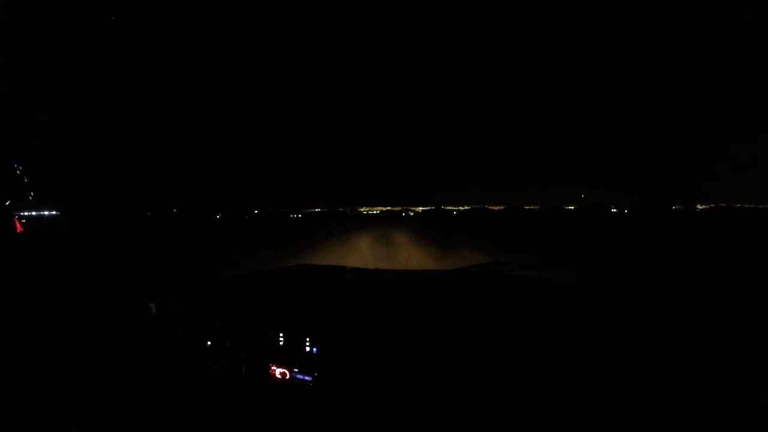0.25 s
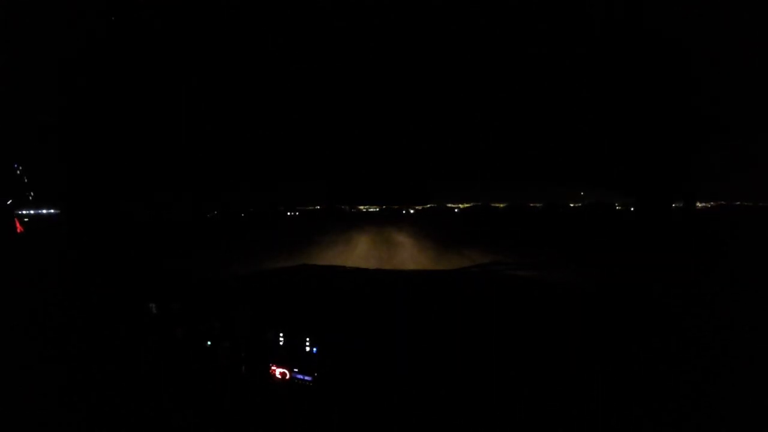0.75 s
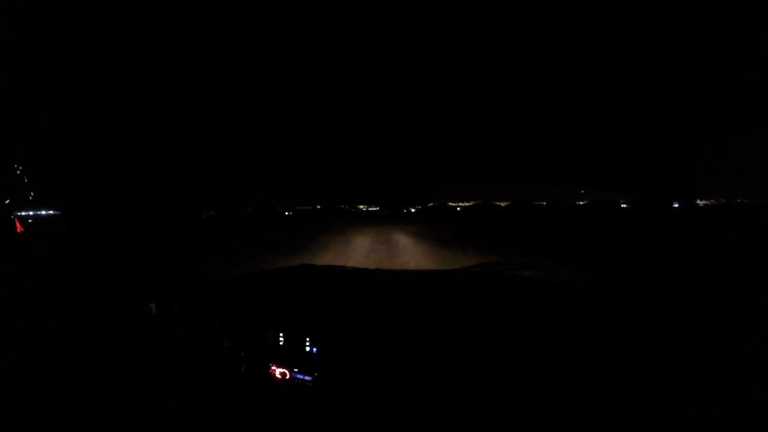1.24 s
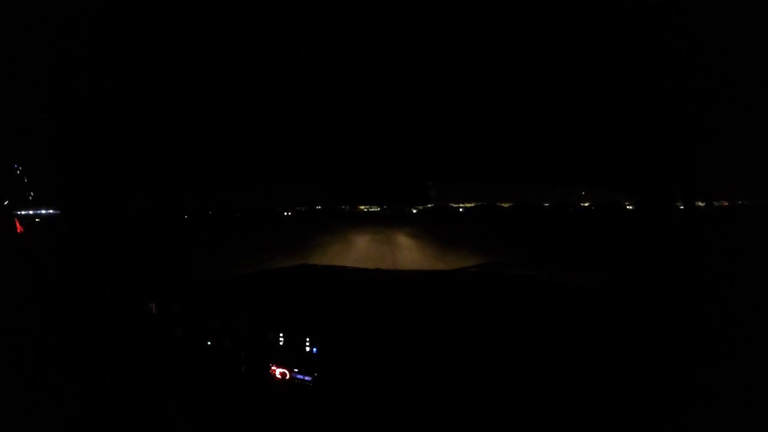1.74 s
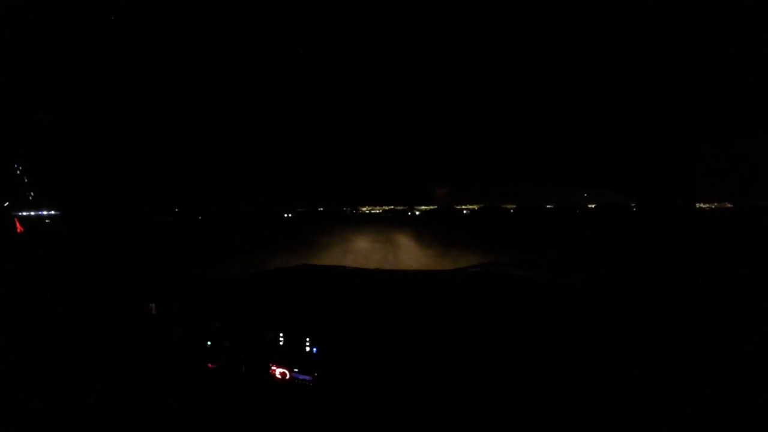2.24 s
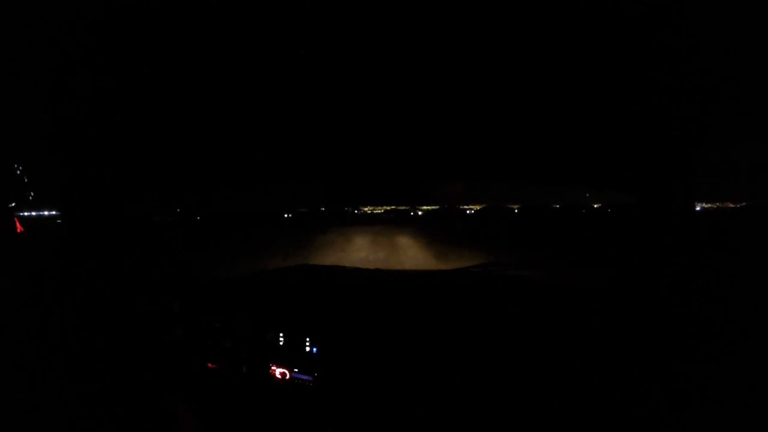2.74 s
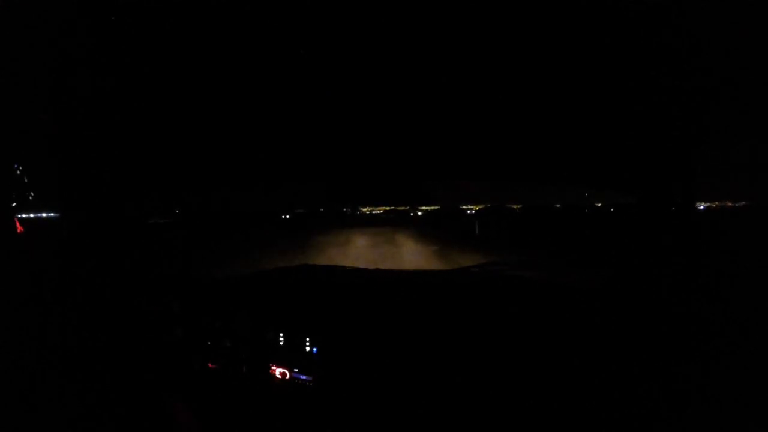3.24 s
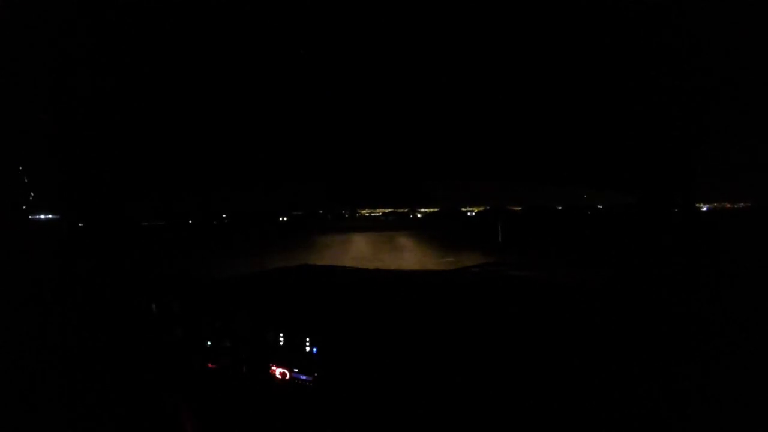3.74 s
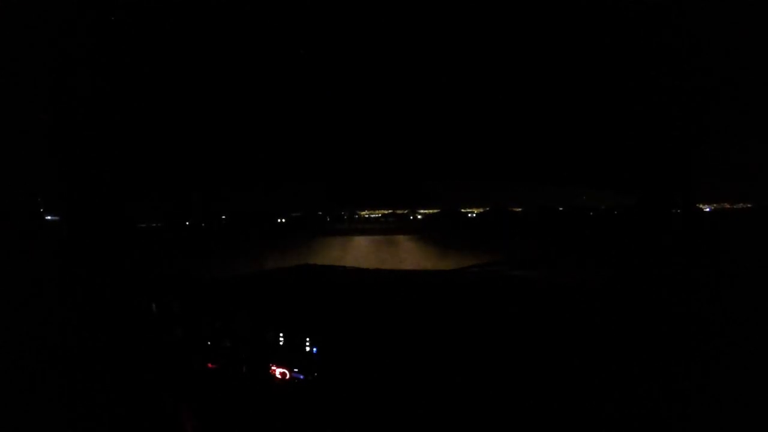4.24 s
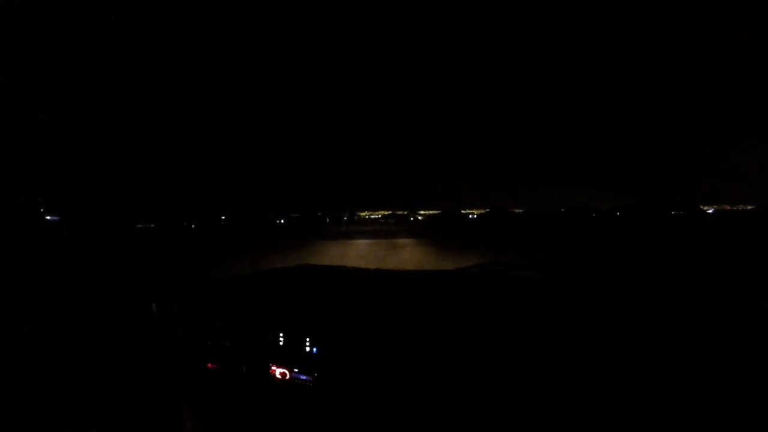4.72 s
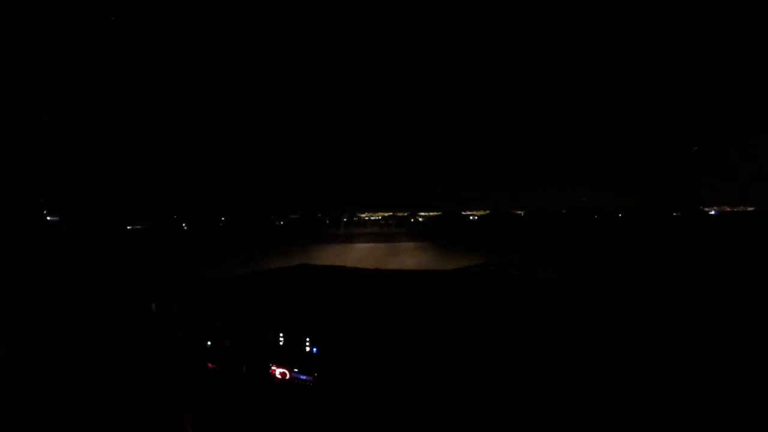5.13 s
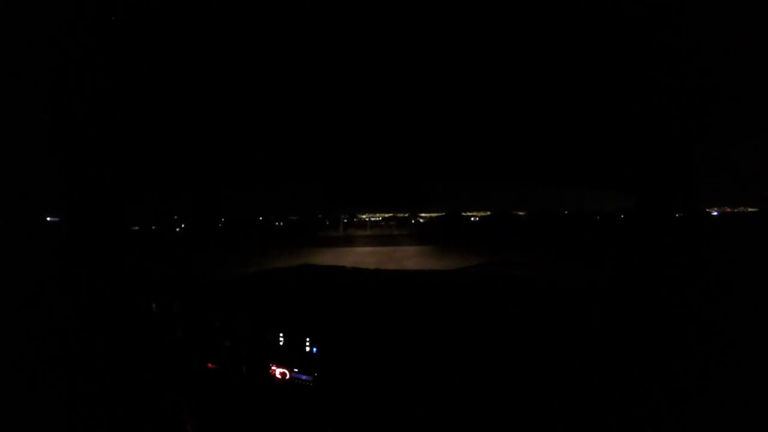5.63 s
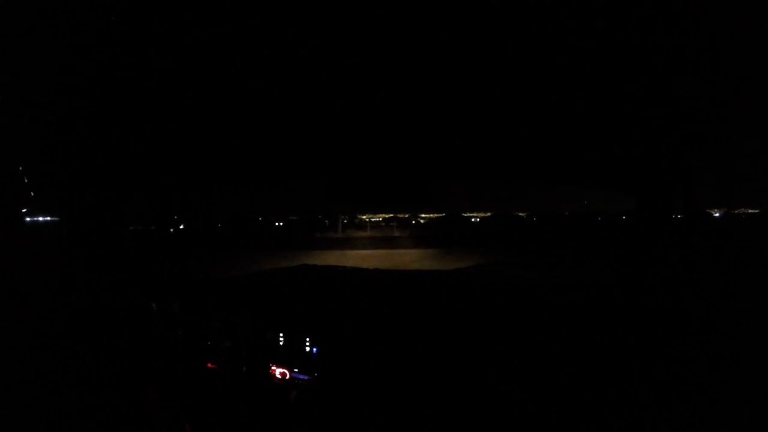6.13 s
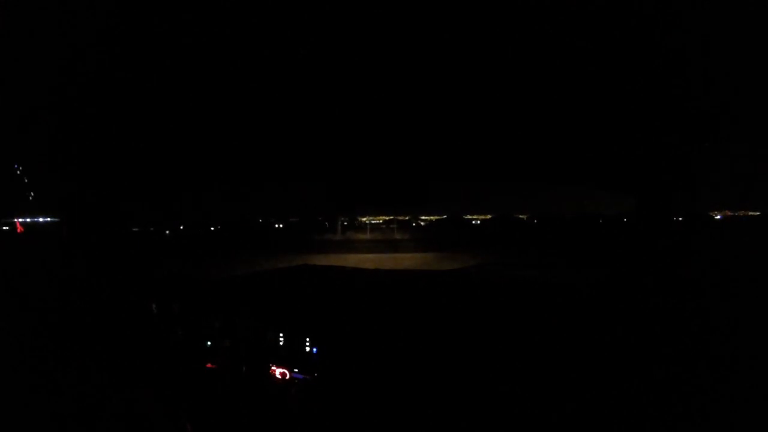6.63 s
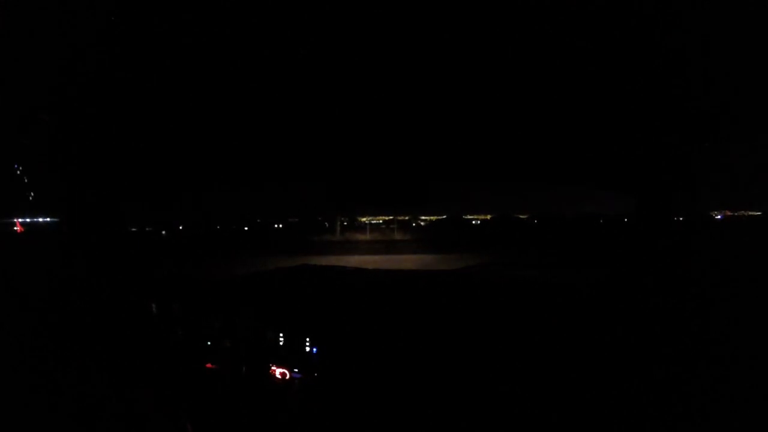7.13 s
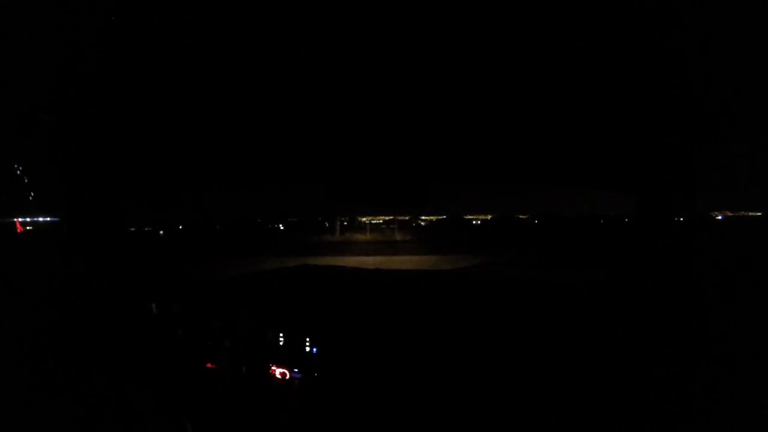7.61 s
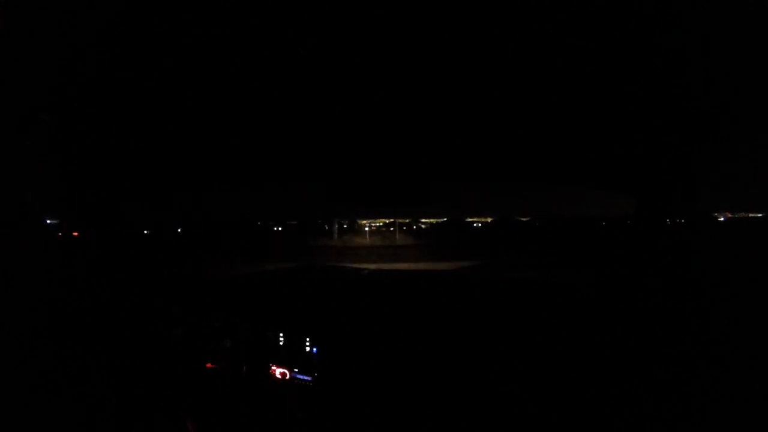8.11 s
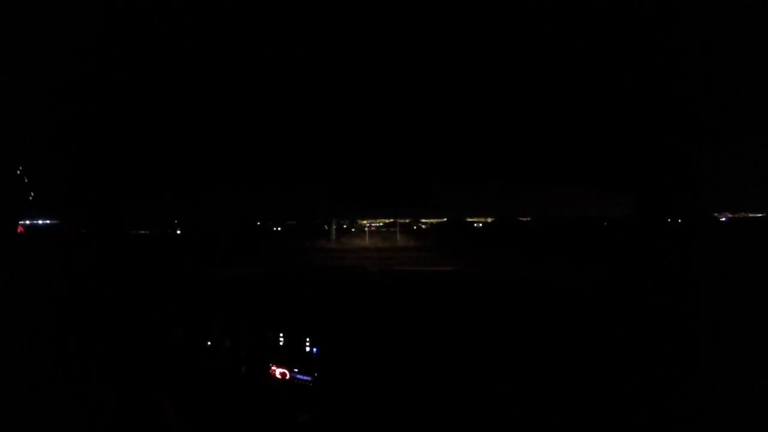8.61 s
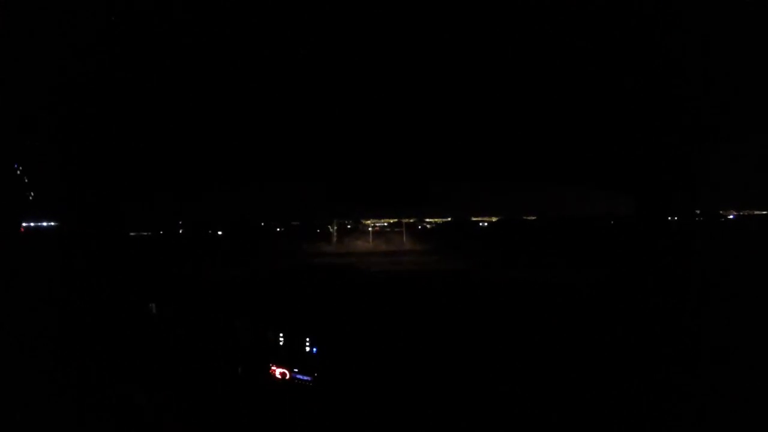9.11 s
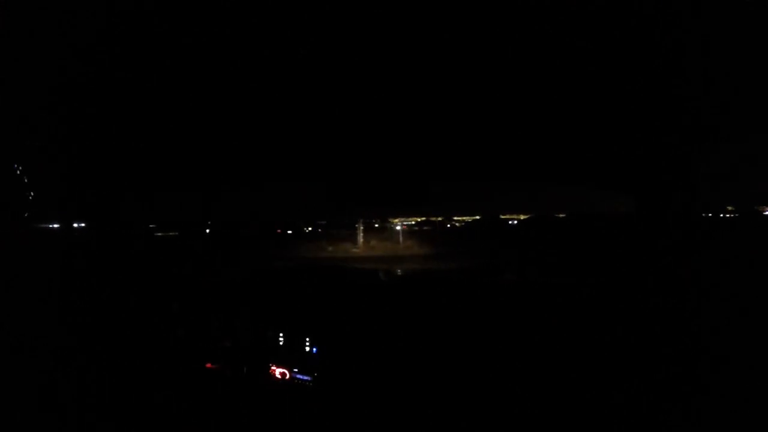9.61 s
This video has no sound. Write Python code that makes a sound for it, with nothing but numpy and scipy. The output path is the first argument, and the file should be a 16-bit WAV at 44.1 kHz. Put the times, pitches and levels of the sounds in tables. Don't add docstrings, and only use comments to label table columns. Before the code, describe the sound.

Low V-eight burble, tyre rumble, faint vent whistle and ticking turn-signal relay in a truck cab; near the end the engine booms and shifts.

```python
import sys
import numpy as np
from scipy import signal
from scipy.io import wavfile
from scipy.ndimage import uniform_filter1d

SR = 44100
rng = np.random.default_rng(int(sys.argv[2]) if len(sys.argv) > 2 else 0)


def volts_from_db(level):
    exponent = np.asarray(level, float) / 20
    return 10 ** exponent


def int16_out(signal):
    q = np.round(np.clip(np.atleast_2d(signal).T, -1, 1) * 32767)
    wavfile.write(sys.argv[1], SR, q.astype(np.int16))


N = 434826
CHANGE_S = 8.0308

# time in seconds, firings per second, firing tone in dB rms,
# load as burble in dB.
PULLING = [
    (8.03, 95.2, -9.5, 3.5),
    (8.38, 95.4, -8.5, 2),
    (8.6, 84.1, -11.5, -1),
    (8.9, 62.64, -12, -3),
    (9.15, 84.96, -10, 4.5),
    (9.36, 80.3, -10.5, 7),
    (9.78, 102.4, -11.5, 1),
    (9.86, 101.3, -12, 4),
]


def in_time(rows):
    s, *columns = np.transpose(rows)
    return [np.interp(np.arange(N) / SR, s, column) for column in columns]


def at_hz(points, hz):
    points = np.array(points)
    return np.interp(np.log(hz), np.log(points[:, 0]), points[:, 1])


def bumps(rows):
    t = np.arange(0, N + 40, 40) / SR
    rises = sum(db * np.exp(-((t - s) / half) ** 2) for s, half, db in rows)
    return np.interp(np.arange(N) / SR, t, rises)


def rms_one(x):
    return x / np.sqrt(np.mean(x ** 2) + 1e-20)


def drift(rate):
    r = np.exp(-80 * np.pi * rate / SR)
    noise = rng.standard_normal(N // 40 + 2002)
    slow = signal.lfilter([1], [1, -2 * r, r * r], noise)[2000:]
    return np.interp(np.arange(N) / 40, np.arange(len(slow)), rms_one(slow))


def resonate(x, hz, width):
    r = np.exp(-np.pi * width / SR)
    return signal.lfilter([1, 0, -1], [1, -2 * r * np.cos(2 * np.pi * hz / SR), r * r], x)


def ring(clicks, hz, t60):
    r, w = 10 ** (-3 / (t60 * SR)), 2 * np.pi * hz / SR
    return signal.lfilter([0, np.sin(w)], [1, -2 * r * np.cos(w), r * r], clicks + 1e-18)


def puff(t60, rise_s):
    t = np.arange(SR // 8) / SR
    return rng.standard_normal(len(t)) * (1 - np.exp(-t / rise_s)) * volts_from_db(-60 * t / t60)


def engine(curve, orders, path, wander_db, jitter, inertia_s, throb_db):
    # frequency in Hz, width in Hz, depth in dB.
    dead_spots = [(77.1, 0.72, -24), (101.8, 1.4, -7.5)]
    cab_lag_s = 0.02
    firing, firing_db, burble_db = in_time(curve)
    firing = uniform_filter1d(firing, round(inertia_s * SR))
    heard = np.interp(np.arange(N) - cab_lag_s * SR, np.arange(N), firing)
    for hz, width, db in dead_spots:
        firing_db = firing_db + db * np.exp(-((heard - hz) / width) ** 2)

    cycle = 2 * np.pi * np.cumsum(firing) / SR / 8
    cycle = cycle - cycle[round(CHANGE_S * SR)]
    out = -volts_from_db(firing_db + throb_db * drift(4)) * np.cos(8 * cycle)
    for multiple, level_db in orders:
        if multiple == 8:
            continue
        unsteady = drift(3.6)
        phase = multiple * cycle + rng.uniform(0, 2 * np.pi) + jitter * drift(1.86)
        load_share = 1 + 0.047 * max(multiple - 30, 0)
        path_db = at_hz(path, multiple * firing / 8)
        gain_db = level_db + burble_db * load_share + path_db + wander_db * unsteady
        out = out + volts_from_db(gain_db) * np.sin(phase)
    return np.sqrt(2) * out


def rolling_engine():
    # time in seconds, firings per second, firing tone in dB rms, load as burble in dB.
    revs = [(0.0, 52, -26, -10.5), (.85, 53, -21, -4.5), (1.27, 49.8, -20.5, -3), (1.68, 59.5, -13.5, -1.5),
            (2.1, 59.8, -13.5, 0), (2.7, 57.7, -15.5, -1), (3.85, 57.1, -17.5, -2), (4.2, 55.6, -18, -2.5),
            (5.2, 57.2, -21.5, -1.5), (6.1, 57, -16.5, -2.5), (8.03, 57.8, -15, -1.5)]
    # multiple of the four-stroke cycle, level in dB rms.
    banks = [(2, -33), (3, -25), (5, -36), (6, -32), (8, -18), (11, -38), (12, -36), (13, -22), (14, -31),
             (15, -32), (16, -22), (17, -44), (18, -42), (19, -38), (20, -28), (21, -31), (22, -36),
             (23, -30), (25, -36), (28, -46), (31, -41), (32, -45), (33, -45), (34, -45), (36, -52),
             (40, -46)]
    # frequency in Hz, gain in dB.
    coasting = [(14, 0.5), (100, 1.5), (116, 2), (119, -5.5), (135, 2), (160, 1.5), (300, 5)]
    return engine(revs, banks, coasting, wander_db=1.0, jitter=.18, inertia_s=.2, throb_db=1.0)


def pulling_engine():
    # multiple of the four-stroke cycle, level in dB rms.
    banks = [(2, -32), (3, -37.5), (4, -40.5), (6, -35), (8, -11), (10, -38), (11, -35.5), (13, -30.5),
             (14, -39), (16, -30), (17, -33), (18, -37.5), (19, -38), (20, -45), (21, -43.5), (22, -46),
             (24, -39), (26, -38.5), (28, -54.5), (32, -43.5), (34, -54), (35, -43), (36, -57), (38, -59.5),
             (39, -43.5), (40, -48.5)]
    # frequency in Hz, gain in dB.
    exhaust = [(14, 0), (110, 3.5), (145, -6), (205, 2.5), (260, 4), (350, -17), (440, 3.5), (470, -8.5)]
    return engine(PULLING, banks, exhaust, wander_db=2, jitter=.3, inertia_s=.06, throb_db=.8)


def change_scene(before, after, bend_s):
    at = round(CHANGE_S * SR)
    jump = -.66
    gap = after[at] - jump - before[at]
    before = before + gap * np.exp((np.arange(N) - at).clip(max=0) / (bend_s * SR))
    return np.r_[before[:at], after[at:]]


def blinks(first_s, level_db, fade_db_per_s):
    blink_s = .7159
    before = np.arange(first_s[0], CHANGE_S, blink_s)
    after = np.arange(first_s[1], N / SR, blink_s)
    s = np.r_[before, after]
    db = level_db + fade_db_per_s * np.minimum(s, CHANGE_S) - 4 * (s > CHANGE_S)
    return np.c_[s, db + 0.5 * rng.standard_normal(len(s))]


def relay(events, modes, level_db, crack_db, t60, lead_s):
    mode_spread_db = 3.0
    contact = puff(t60, rise_s=0.0025)
    rings = np.array([volts_from_db(db) * ring(contact, hz, ring_s) for hz, db, ring_s in modes])
    bright = signal.butter(2, [4000, 12000], "band", fs=SR, output="sos")
    out = np.zeros(N + SR)
    for s, db in events:
        housing = volts_from_db(mode_spread_db * rng.standard_normal(len(modes))) @ rings
        crack = rms_one(signal.sosfilt(bright, contact + 2.4 * puff(t60, rise_s=0.0011)))
        click = rms_one(housing) + volts_from_db(crack_db) * crack
        start = max(round((s - lead_s) * SR), 0)
        out[start:start + len(click)] += volts_from_db(db + level_db) * click
    return out[:N]


def relay_ticks():
    # frequency in Hz, level in dB, t60 in seconds.
    tick_modes = [(4100, -12, 0.033), (5190, 0, 0.011), (6000, 4, 0.012), (6360, 5, .01),
                  (7470, -0.5, 0.014), (8240, -3.5, .015), (8150, -11, .015), (10300, -19, .02),
                  (10300, -13, 0.014), (11800, -17, .012), (13100, -15, .01), (14300, -16, .01)]
    closing = blinks((.0225, 8.337), level_db=-29, fade_db_per_s=0)
    return relay(closing, tick_modes, level_db=-25, crack_db=-4.5, t60=0.04, lead_s=0.0019)


def relay_tocks():
    # frequency in Hz, level in dB, t60 in seconds.
    tock_modes = [(4100, -15, .02), (4600, -3, .02), (5830, 2, 0.028), (6300, -1, 0.017), (7240, 6, .015),
                  (7720, -4, 0.0065), (8200, -8, .015), (8640, -6, 0.012), (10600, -28, .01),
                  (11200, -19, .015), (13700, -12, 0.011), (14700, -14, .01)]
    open_s = .366
    opening = blinks((.0225 + open_s, 8.337 + open_s), level_db=-33, fade_db_per_s=-0.18)
    return relay(opening, tock_modes, level_db=-23.5, crack_db=-6.0, t60=0.037, lead_s=.0001)


def trim():
    # start in seconds, peak in dB, centre in Hz, width in Hz, t60 in seconds.
    rattles = [(0.284, -25, 1400, 1800, 0.055), (.285, -42, 3300, 1800, 0.067),
               (1.861, -27, 1590, 1690, .09), (2.133, -34, 2800, 1500, .06), (3.511, -39, 5500, 4000, .05),
               (3.527, -35, 3700, 1000, 0.044), (3.724, -39, 5000, 3000, .04),
               (4.610, -39, 5500, 3000, .04), (5.232, -44, 5500, 3000, .03), (5.274, -36, 6800, 2500, .05),
               (5.568, -39, 5030, 3480, .06), (6.905, -39, 900, 1000, .05), (8.056, -41, 2290, 300, 0.055),
               (8.868, -36, 1798, 1010, 0.056), (9.085, -40, 3800, 800, 0.042),
               (9.239, -35, 5000, 2493, .06), (9.238, -44, 9500, 5000, 0.035), (9.245, -32, 2000, 900, .06),
               (9.795, -54, 9700, 1500, 0.052)]
    out = np.zeros(N + SR)
    for s, db, hz, width, t60 in rattles:
        knock = resonate(resonate(puff(t60, rise_s=0.0018), hz, width), hz, width)
        start = round(s * SR)
        out[start:start + len(knock)] += volts_from_db(db) * knock / abs(knock).max()
    return out[:N]


def vents():
    # frequency in Hz, width in Hz, level in dB rms, change in dB after the scene changes,
    # share of the swell from 0 to 1.
    whistles = [(1430.5, 66, -45, -1, 0.58), (1940, 90, -55, -3, 0), (542, 6.2, -46, -6.5, 0.4),
                (2437, 320, -56.5, 4.5, 0.3), (3800, 920, -52.5, -4.5, .05), (771, 120, -51.5, 1, 0.1)]
    # middle in seconds, rise in dB.
    swells = [(0.0, -1), (.29, 2), (.8, 12), (1.28, 1), (1.68, 9), (2.08, 9), (2.64, 0), (2.9, 8), (3.2, 6),
              (3.5, 8), (3.9, 3), (4.4, 2), (4.8, -1), (5.33, 6), (5.65, 6), (5.94, 11), (6.64, -1),
              (6.96, 6), (7.4, 1), (7.63, 5), (8.9, 9), (9.2, 8), (9.5, 15.5), (9.78, 10)]
    after = np.arange(N) >= CHANGE_S * SR
    swell_db = -2 - 9.5 * after + bumps([(s, 0.1, db) for s, db in swells])
    out = 0
    for hz, width, tone_db, change_db, share in whistles:
        gain = volts_from_db(tone_db + change_db * after + share * swell_db)
        air = resonate(resonate(rng.standard_normal(N), hz, width), hz, width)
        out = out + gain * rms_one(air)
    return out


def road(patchy_db, gust_db, flutter_db):
    # frequency in Hz, level in dB per Hz.
    colour = [(14, -12), (40, -6.5), (75, -12), (120, -12), (170, -11.5), (290, -17), (345, -22.5),
              (940, -32), (1070, -34.5), (1750, -41.5), (3050, -47), (5000, -51), (12000, -68.5),
              (15300, -77.5)]
    # middle in seconds, half length in seconds, rise in dB.
    rough = [
        (.45, 0.49, 4.5),
        (2.08, 0.043, -0.5),
        (3.7, .12, 1.5),
        (4.25, 0.14, 20),
        (4.85, 0.39, 18.5),
        (5.4, 0.47, 7),
        (6.4, 0.37, 0.5),
        (9.45, .2, 9),
    ]
    # frequency in Hz, share of roughness, extra dB at the start,
    # dB after the scene changes, dB of the dip there, share of load.
    answer = np.transpose([(24, 0.64, 6, -3, -2, 0), (45, 0.28, 4, -5, -0.5, 0),
                           (96, .3, 3.5, 6, -8, -0.41), (240, 0, 7, 0.5, -4.5, -0.082),
                           (900, 0, 6.5, -1.5, -3, 0.083), (1800, 0, 1.3, -4, -3.5, 0.25),
                           (12000, 0, 0, -2, -4, .1)])
    settle_s, recover_s = 1.63, 0.25

    t = np.arange(N) / SR
    after = t >= CHANGE_S
    dip = after * np.exp((CHANGE_S - t).clip(max=0) / recover_s)
    load = after * in_time(PULLING)[-1]
    causes = np.array([bumps(rough), np.exp(-t / settle_s), after, dip, load])

    edges = np.r_[12.8 * 2 ** np.arange(0, 9.8, 1 / 3), np.arange(11500, 16100, 650)]
    white, gust, out = rng.standard_normal((2, N + SR)), drift(2.9), 0
    for k, (low, high) in enumerate(zip(edges, edges[1:])):
        hz = np.sqrt(low * high)
        sos = signal.butter(3, [low, high], "band", fs=SR, output="sos")
        band = signal.sosfilt(sos, white[k % 2])[SR:]
        shares = np.array([np.interp(np.log(hz), np.log(answer[0]), row) for row in answer[1:]])
        flicker_db = patchy_db * (hz > 150) * drift(9.5) + flutter_db * (hz > 12200) * drift(40)
        out = out + volts_from_db(at_hz(colour, hz) + shares @ causes + flicker_db + gust_db * gust) * band
    return volts_from_db(-20) * rms_one(out)


def scene():
    drive = change_scene(rolling_engine(), pulling_engine(), bend_s=.004)
    cab = relay_ticks() + relay_tocks() + trim() + vents()
    cab = cab + road(patchy_db=0.68, gust_db=0.04, flutter_db=3.0)
    cab = signal.sosfilt(signal.ellip(10, .5, 60, 15250, fs=SR, output="sos"), cab)
    return (drive + cab)[None]


def top_cut(x):
    return signal.sosfilt(signal.butter(12, 16660, fs=SR, output="sos"), x)


def record(dry):
    rounded = 1.3 * np.tanh(dry / 1.3)
    x = signal.sosfilt(signal.cheby2(10, 55, 17100, fs=SR, output="sos"), rounded)
    n = np.arange(N)
    fade = np.clip(np.minimum(n / .002, (N - n) / .006) / SR, 0, 1)
    return top_cut(x * fade)


dry = scene()
out = record(dry)
int16_out(out)
```